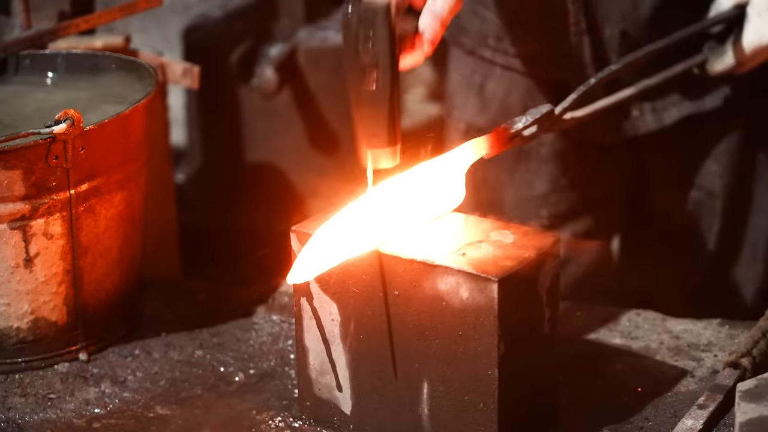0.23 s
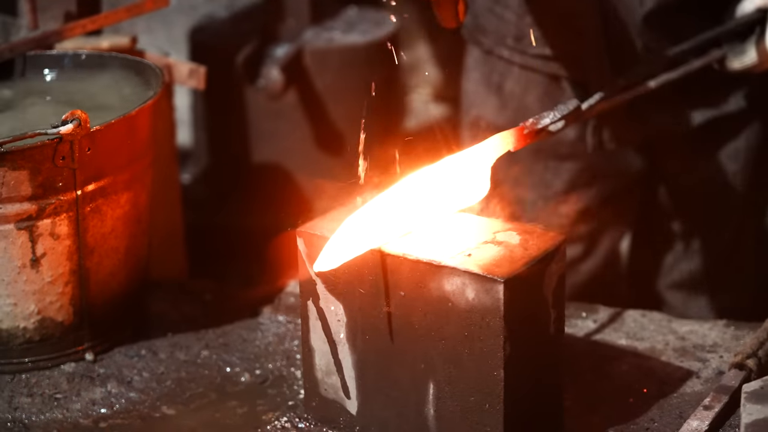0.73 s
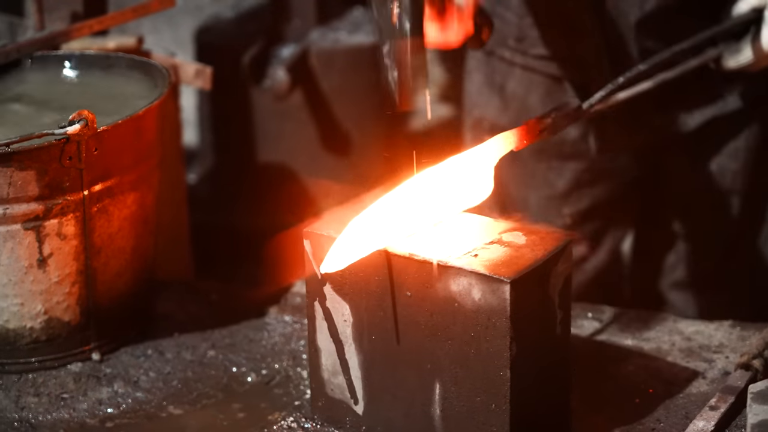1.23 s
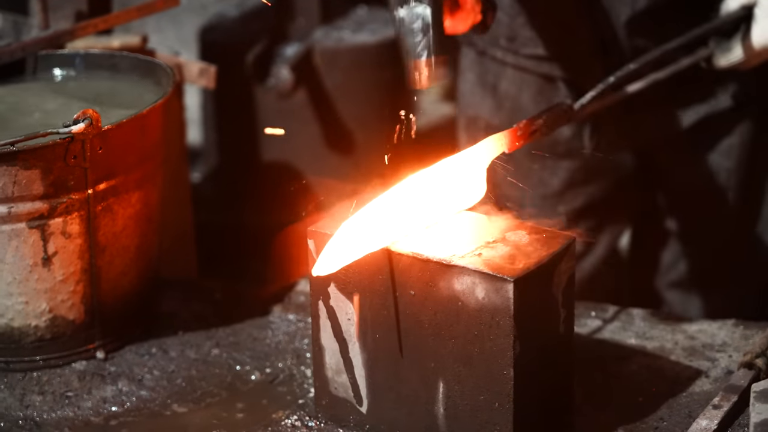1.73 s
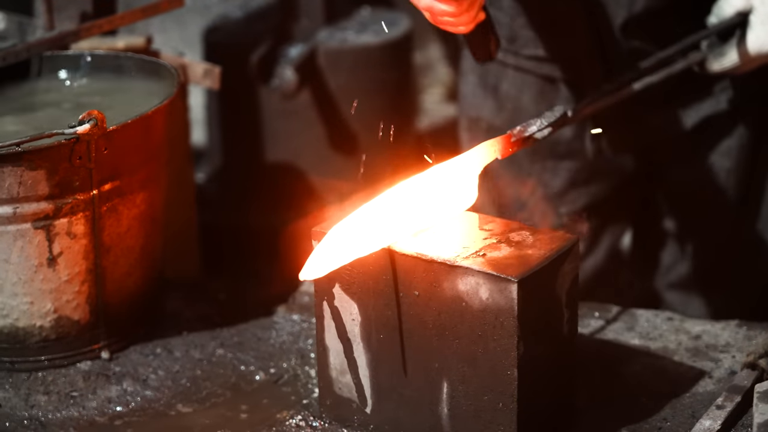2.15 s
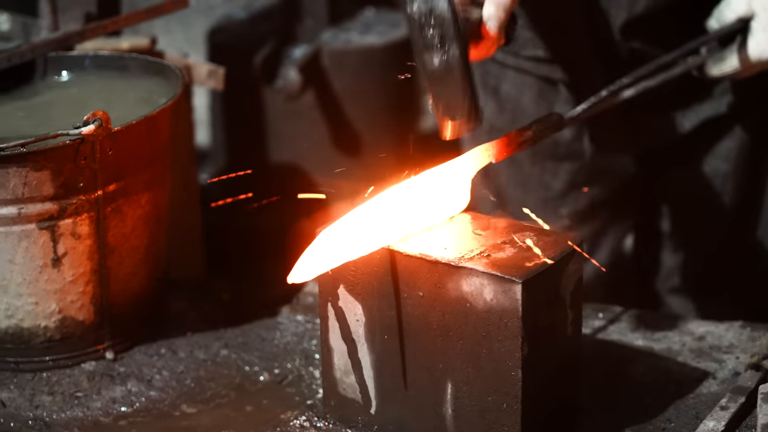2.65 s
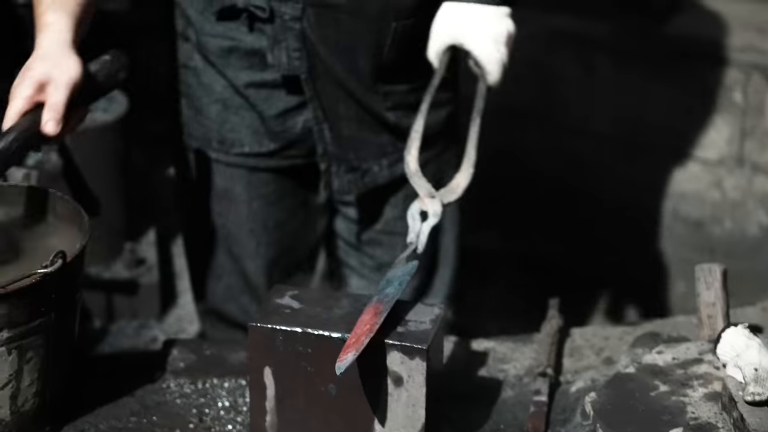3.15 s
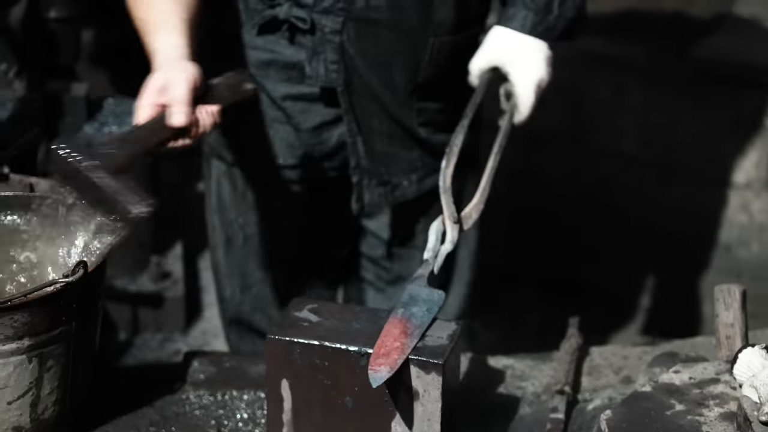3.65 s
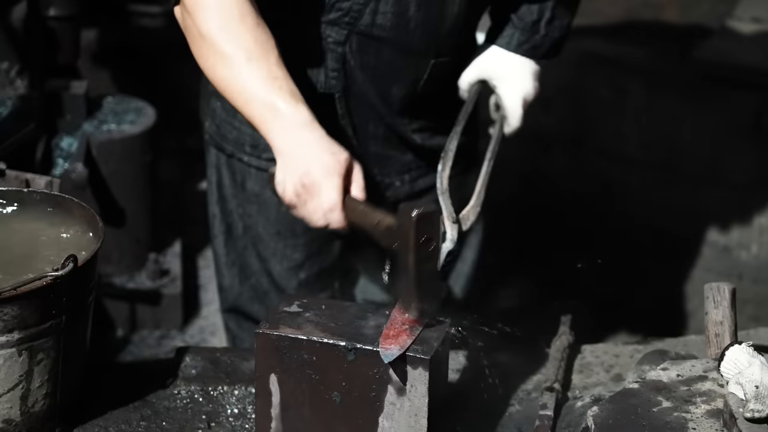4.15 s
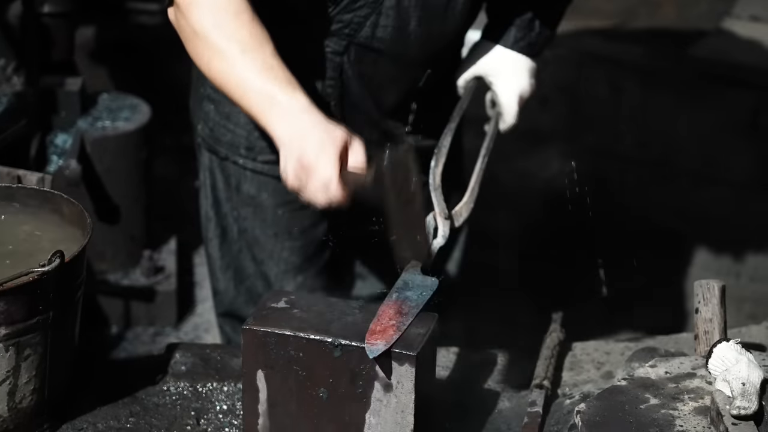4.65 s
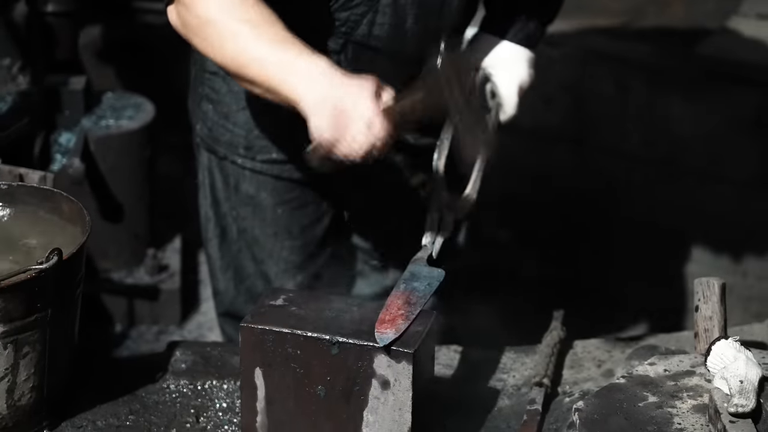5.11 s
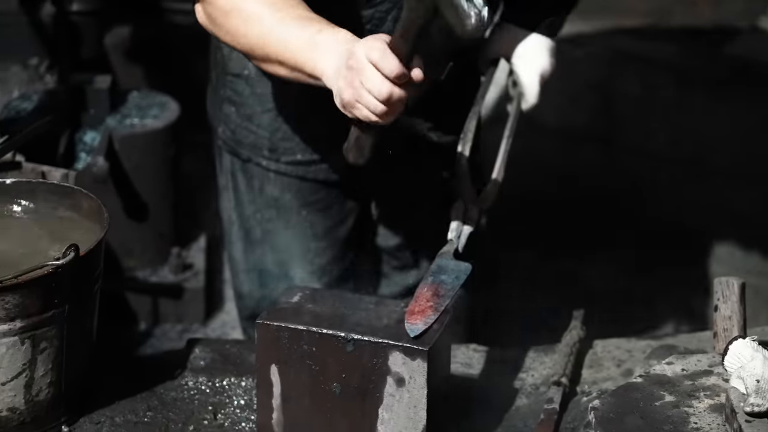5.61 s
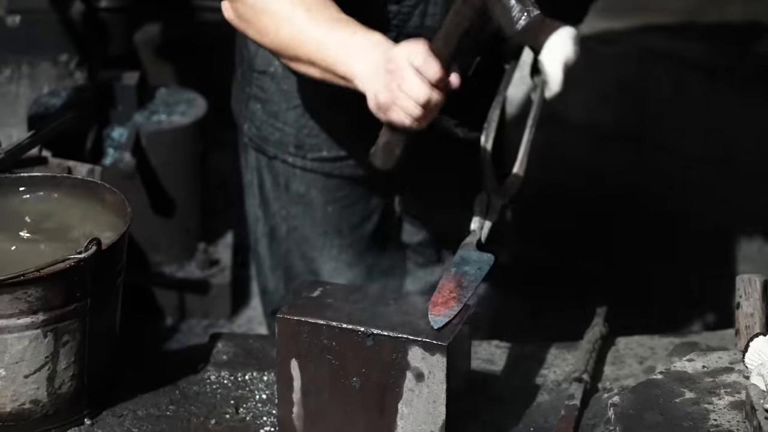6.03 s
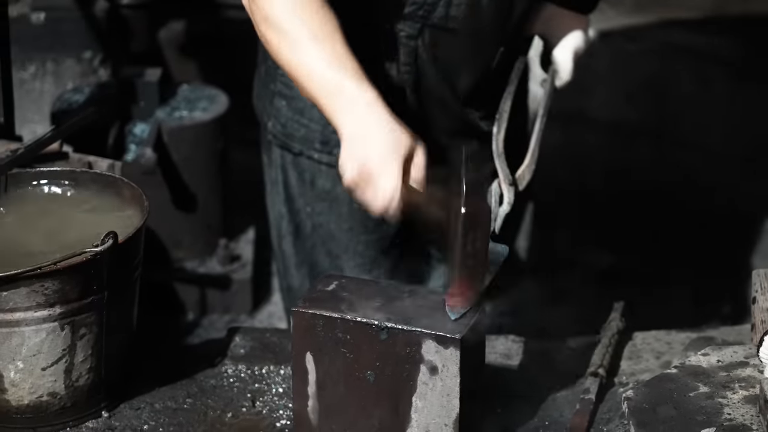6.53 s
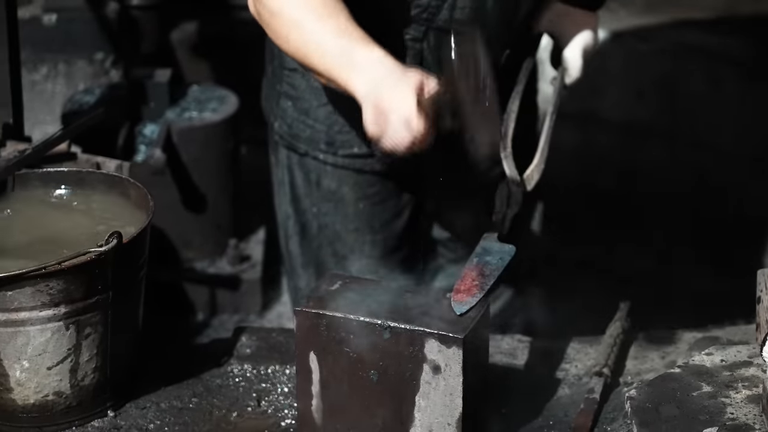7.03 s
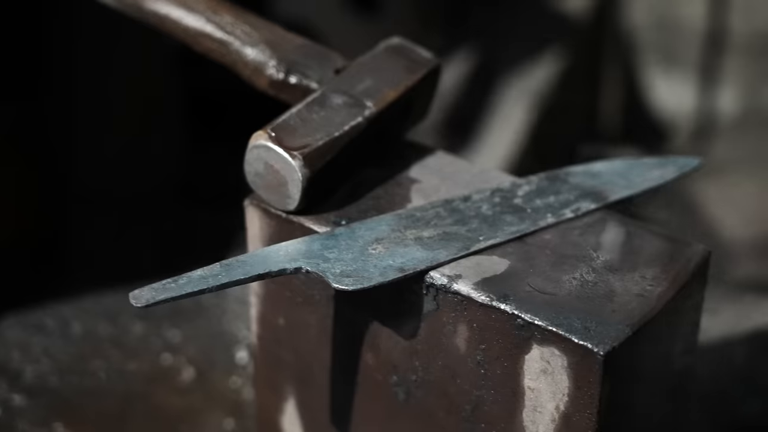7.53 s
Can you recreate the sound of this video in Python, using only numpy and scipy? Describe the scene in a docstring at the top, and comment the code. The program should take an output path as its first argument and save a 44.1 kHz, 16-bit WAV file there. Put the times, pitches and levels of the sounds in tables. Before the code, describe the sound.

Inside a hard-walled forge workshop, heard close, a hand hammer works glowing steel over a low, patchy roar that slowly fades. Two clanking blows come almost together at 0.0 and 0.1 s, then duller, knocking thuds at 0.5 and 0.9 s and about every third of a second until 2.9 s, with faint scale pops and fizz. At 3.1 s the place changes to a quieter, more distant forge hum. From 3.5 to 3.7 s bubbles drip and water splashes; spitting and sizzling swell from 3.85 s into a bright, wet blow at 4.1 s. From 4.55 to 7.27 s eight far louder, hard blows fall roughly every 0.4 s, each a sharp crack with clanking tongs, short high anvil ring and dense shop echo. At 7.55 s the echo is cut off; only very soft low noise and thin treble hiss remain.

```python
"""A hand hammer forges a blade on a block anvil: noise cracks plus dying sines of blade, tongs, anvil and
stand. First dull blows on glowing steel over the roar of the forge, which is patchy filtered noise. Then the
scene changes: the hammer is dipped in a bucket: bubbles drip, noise bursts spit, and hard blows ring the anvil
and fill the shop with decaying echoes. In a third scene only a quiet hiss over soft background noise remains."""
import sys
import numpy as np
from scipy import signal
from scipy.io import wavfile
from scipy.ndimage import uniform_filter1d

SR = 44100
rng = np.random.default_rng(int(sys.argv[2]) if len(sys.argv) > 2 else 0)


def put_to_file(sound):
    """Save the sound as 16-bit audio at rate SR, in the file named by the first command-line argument."""
    columns = np.atleast_2d(sound).T  # one column per channel
    safe = np.clip(columns, -1, 1)
    whole_steps = np.round(safe * 32767)
    wavfile.write(sys.argv[1], SR, whole_steps.astype(np.int16))


N = 342657
SCENE_CHANGES_S = 3.13, 7.545  # the scene changes
HARD_FROM_S = 4.3  # from here the steel is hard and the swings are full


def amp(db):
    """Decibels to amplitude factor."""
    return 10 ** (np.asarray(db) / 20)


def evened(x):
    """Scale to RMS 1."""
    return x / np.sqrt(np.mean(x ** 2) + 1e-20)


def read(points_hz, values, hz):
    """Interpolate a table along log frequency."""
    return np.interp(np.log(hz + 1), np.log(np.asarray(points_hz) + 1), values)


def add(mix, start_s, sound):
    """Add a sound in place, cut at the end of the mix."""
    part = mix[round(start_s * SR):][:len(sound)]
    part += sound[:len(part)]


def coloured(x, points, tilt_db_per_octave=0):
    """Causal (minimum-phase) filter with the given spectrum, tilted about 2 kHz."""
    hz = np.abs(np.fft.fftfreq(2048, 1 / SR))
    tilt_db = tilt_db_per_octave * np.log2((hz + 50) / 2000)
    gain_db = np.maximum(read(*np.transpose(points), hz) + tilt_db, -80)
    # the Hilbert transform of the log gain is the minimum phase
    spectrum = np.exp(np.conj(signal.hilbert(np.log(amp(gain_db)))))
    impulse = np.fft.ifft(spectrum).real[:1024]
    return signal.oaconvolve(x, impulse)


def noise(points, patchy_db, size):
    """Steady noise of RMS 1 with drifting louder and softer patches in time and frequency."""
    frames = 4 * N // size + 5
    hz = np.fft.rfftfreq(size, 1 / SR)
    real, imag, patches = rng.standard_normal((frames, len(hz), 3)).T
    patches = uniform_filter1d(patches, size=12, axis=0)
    patches = evened(uniform_filter1d(patches, size=8, axis=1))
    level_db = read(*np.transpose(points), hz)[:, None] + patchy_db * patches
    bins = (real + 1j * imag) * amp(level_db)
    return evened(signal.istft(bins, nperseg=size, noverlap=size - size // 4)[1][:N])


def rings(hz, db, t60_s, spread_db, t):
    """Dying sines of peak 1; each level varies at random by spread_db."""
    db = db + spread_db * rng.standard_normal(len(hz))
    out = np.zeros(len(t))
    for mode_hz, mode_db, mode_t60_s in zip(hz, db, t60_s):
        out += amp(mode_db - 60 * t / max(mode_t60_s, .01)) * np.sin(2 * np.pi * mode_hz * t)
    return out / abs(out).max()


# Shop echo in the first and second scene. Each row: frequency in Hz, relative colour in dB, t60 in s.
NEAR_ECHO = [(80.5, -26.5, 0.17), (223, 6, 0.64), (545, -1.5, 0.47), (900, 7.5, 0.42), (1360, 1, 0.4),
             (1950, 7, 0.43), (2750, 8, 0.41), (3880, 5.5, 0.34), (7000, 0, 0.48), (10000, -6, 0.44),
             (15100, -9.5, 0.4)]
FAR_ECHO = [(79, -30, 0.68), (218, 15.5, 0.37), (520, 2, 0.5), (767, -1.5, 0.48), (953, 8, 0.56),
            (1140, 2.5, 0.43), (1360, -1.5, 0.48), (2580, 3.5, 0.44), (4200, 1.5, 0.42), (7100, 1, 0.38),
            (10600, 1, 0.3), (16000, -11, 0.3)]


def echo(x, table, build_s, first_s):
    """Shop: sparse reflections build up after first_s, then each band dies at its own speed."""
    points_hz, colour_db, t60_s = np.transpose(table)
    sparse = rng.standard_normal(SR) * (rng.random(SR) < .15)
    hz, t, bins = signal.stft(sparse, SR, nperseg=256)
    decay_db = 60 * t / read(points_hz, t60_s, hz)[:, None]
    bins = bins * amp(read(points_hz, colour_db, hz)[:, None] - decay_db)
    tail = signal.istft(bins, SR, nperseg=256)[1][:SR]
    since_first_s = np.maximum(np.arange(SR) / SR - first_s, 0)
    tail = tail * (1 - np.exp(-since_first_s / build_s))
    return signal.fftconvolve(x, tail / np.linalg.norm(tail))[:N]


# Third-scene background spectrum. Each row: frequency in Hz, relative density in dB per Hz.
THIRD_SPECTRUM = [(18, -67), (30, -43), (119, -4), (359, -19), (384, -18), (439, -18.5), (816, -23),
                  (1220, -22.5), (6000, -36), (7800, -81), (13200, -120)]
THIRD_RMS_DB = -54


def third_scene_background():
    """Soft patchy noise, strongest in the low frequencies."""
    return amp(THIRD_RMS_DB) * noise(THIRD_SPECTRUM, 1.9, size=2048)


HISS_RMS_DB = -60


def hiss():
    """Treble hiss; a close surface returns it 38 samples later and combs it."""
    x = noise([(4000, -20), (7000, -3), (9500, -3), (13000, -5), (15600, -11), (16000, -40)], 0.97, size=256)
    return amp(HISS_RMS_DB) * evened(x + .6 * np.roll(x, 38))


# Forge from afar. Each row: frequency in Hz, relative density in dB per Hz.
DISTANT_FORGE_SPECTRUM = [(18, -57), (30, -33), (107, -4.5), (158, -4), (185, -6), (312, -17), (384, -14),
                          (497, -15), (1170, -18), (1920, -21), (7240, -33.5), (15000, -51.5)]
DISTANT_FORGE_RMS_DB = -59.5


def distant_forge():
    """Nearly even low noise: the forge heard from afar."""
    return amp(DISTANT_FORGE_RMS_DB) * noise(DISTANT_FORGE_SPECTRUM, 0.38, size=2048)


# Forge close by. Each row: frequency in Hz, relative density in dB per Hz.
ROAR_SPECTRUM = [(18, -68), (30, -62), (135, 2.5), (217, -7), (311, -8.5), (467, -18), (539, -14.5),
                 (700, -24), (808, -22), (1690, -27), (2860, -35), (9000, -47), (11700, -82), (19800, -120)]
ROAR_START_DB, ROAR_FADE_DB_PER_S = -42, -2.5


def forge_roar(t):
    """Patchy low noise that fades steadily."""
    return amp(ROAR_START_DB + ROAR_FADE_DB_PER_S * t) * noise(ROAR_SPECTRUM, 1.5, size=2048)


# Hot scale and water fizzing. Each row: time in s, level in dB.
FIZZ_LEVEL = [(0.0, -66), (1.2, -81), (2.1, -65.5), (3.07, -68), (3.3, -78), (3.76, -68), (3.85, -66),
              (3.88, -58), (4.06, -51), (4.1, -65), (4.22, -65), (4.32, -86), (7.5, -80)]
# Fizz spectrum. Each row: frequency in Hz, relative density in dB per Hz.
FIZZ_SPECTRUM = [(2000, -27), (5000, -8), (8000, 6.5), (12000, 3), (15500, -2), (16200, -33)]


def fizz(t):
    """Treble noise following the level curve of fizzing scale and water."""
    return amp(np.interp(t, *np.transpose(FIZZ_LEVEL))) * noise(FIZZ_SPECTRUM, 1.5, size=256)


# Scale popping, water splashing and spitting, and a small rattle at 4.885 s.
# Each row: start in s, peak in dB, centre in Hz, t60 in s.
BURSTS = [(.373, -44, 8800, 0.032), (.511, -45, 11000, .03), (.55, -48, 12000, .037),
          (1.164, -52, 7500, .08), (1.896, -48, 7860, .1), (2.425, -49, 10000, .012),
          (2.47, -44, 7960, .015), (3.163, -49, 6000, 0.019), (3.287, -48, 7750, 0.032),
          (3.496, -54, 6000, 0.016), (3.549, -54, 6150, .012), (3.613, -47, 5970, .05),
          (3.653, -47, 3000, .022), (3.668, -31, 3600, 0.029), (3.702, -42, 4420, .073),
          (3.8652, -31, 5100, 0.019), (3.918, -35, 10000, .041), (3.931, -36, 10500, 0.022),
          (3.991, -33, 9730, 0.077), (4.007, -31, 10500, .05), (4.042, -28, 9900, 0.058),
          (4.066, -29, 9450, 0.09), (4.885, -48, 3570, 0.15)]
RISE_SHARE = .07  # rise time constant as a share of t60
# faint pops: mid level, centre range, mid t60
FAINT_DB, FAINT_RANGE_HZ, FAINT_T60_S = -53, (5000, 13000), .03


def bursts():
    """Grainy noise bursts round a centre pitch: loud ones in place, 16 faint ones at random until HARD_FROM_S."""
    out, t = np.zeros(N), np.arange(SR // 5) / SR
    when, size, pitch = rng.random((16, 3)).T
    faint_db = FAINT_DB + 6 * (size - .5)
    faint_hz = np.interp(pitch, (0, 1), FAINT_RANGE_HZ)
    faint = zip(when * HARD_FROM_S, faint_db, faint_hz, FAINT_T60_S * (.5 + size))
    for start_s, db, hz, t60_s in [*BURSTS, *faint]:
        grain_db = 3.5 * rng.standard_normal(len(t) // 20 + 1)  # one level per 20 samples
        grains = rng.standard_normal(len(t)) * amp(grain_db).repeat(20)[:len(t)]
        colour = [(hz / 2.6, -26), (hz / 1.35, -5), (hz, 0), (hz * 1.5, -4), (hz * 2.6, -20)]
        burst = coloured(grains, colour)[:len(t)]
        rise = 1 - np.exp(-t / max(RISE_SHARE * t60_s, .0002))
        burst = burst * amp(-60 * t / max(t60_s, .005)) * rise
        add(out, start_s, amp(db) * burst / abs(burst).max())
    return out + amp(-9) * echo(out, NEAR_ECHO, .01, .003)


# Drips. Each row: start in s, level before the rise in dB, starting bubble pitch in Hz.
DRIPS = [(3.476, -51, 820), (3.487, -49, 1090), (3.534, -47, 900), (3.543, -46, 560), (3.541, -48, 1120),
         (3.553, -46.5, 2070), (3.59, -49, 656), (3.651, -47, 1185), (3.685, -53, 1190)]
DRIP_T60_S, DRIP_RISE_S = 0.048, 0.00077


def water():
    """Bubbles: short dying sines that rise in pitch, with their echo."""
    out, t = np.zeros(N), np.arange(SR // 10) / SR
    for start_s, db, hz in DRIPS:
        bubble = np.sin(2 * np.pi * hz * (t + 5.7 * t ** 2))
        envelope = amp(db - 60 * t / DRIP_T60_S) * (1 - np.exp(-t / DRIP_RISE_S))
        add(out, start_s, bubble * envelope)
    return out + amp(-6) * echo(out, FAR_ECHO, 0.035, 0.0068)


# Pitches of the block under the anvil, in Hz.
STAND_HZ = 85, 134, 200, 270, 407, 454, 555, 770, 834
# Same pitches. Each row: relative level in dB, t60 in s.
STAND = [(-46, .1), (0.5, 0.11), (-5, 0.11), (-4.5, 0.061), (-13.5, 0.1), (-7.5, 0.09), (-12.5, 0.03),
         (-12, 0.063), (-13.5, 0.091)]


def stand_thud(t):
    """The block under the anvil: low dying sines with a rise time constant of 6 ms."""
    return rings(STAND_HZ, *np.transpose(STAND), 4.05, t) * (1 - np.exp(-t / 0.006))


def floor_push(t):
    """The floor gives under a full swing: one fast-dying 34 Hz sine."""
    return np.sin(2 * np.pi * 34 * t) * np.exp(-t / 0.0089)


# Pitches of tongs and blade, in Hz.
TONGS_HZ = 893, 938, 1010, 2180, 2300, 2420, 2940, 3915, 4070, 4220
# Same pitches. Each row: relative level in dB, t60 in s, dB gained across the face.
TONGS = [(-4, 0.061, 4), (0, 0.076, -7), (-4.5, 0.099, -3), (-4.5, 0.039, 1), (-1, 0.027, 11.5),
         (1.5, 0.02, 7.5), (-4, 0.017, 6), (-7, 0.082, 0), (1.5, 0.02, -3), (0.5, 0.02, -10)]


def tongs_clank(across, t):
    """Tongs and blade: dying sines balanced by the landing place across the face."""
    mode_db, t60_s, across_db = np.transpose(TONGS)
    return rings(TONGS_HZ, mode_db + across * across_db, t60_s, 2.0, t)


KNOCK_HZ, KNOCK_T60_S = 1450, .01


def blade_knock(t):
    """The blade's short bending ring: one dying sine."""
    return amp(-60 * t / KNOCK_T60_S) * np.sin(2 * np.pi * KNOCK_HZ * t)


# Pitches of anvil and hammer head, in Hz.
ANVIL_HZ = 6352, 7760, 7858, 8355, 8420, 8915, 9445, 11400, 12400
# Same pitches. Each row: relative level in dB, t60 in s, dB gained along the face, dB gained across it.
ANVIL = [(-0.5, 0.053, 0.5, -15), (-4.5, 0.08, -7.5, -11), (-1, 0.11, -6.5, 7), (-4.5, 0.15, 1, -7.5),
         (-6.5, .08, 3, -11.5), (-6.5, 0.14, 8.5, -7.5), (-13, 0.09, 1, 12), (-10, .11, -4.5, -6),
         (-28, .05, 10, -1.5)]


def anvil_ring(along, across, t):
    """Anvil and hammer head: high dying sines balanced by the landing place."""
    mode_db, t60_s, along_db, across_db = np.transpose(ANVIL)
    return rings(ANVIL_HZ, mode_db + along * along_db + across * across_db, t60_s, 1.0, t)


# Crack on glowing and on darker, cooler steel. Each row: frequency in Hz, relative density in dB per Hz.
GLOWING_CRACK = [(60, -32.5), (300, -6.5), (930, -1.5), (1510, -8.5), (2600, -11.5), (4370, -13.5),
                 (7000, -15.5), (9500, -18), (11000, -23.5), (13800, -32), (15700, -31), (17000, -46)]
DARK_CRACK = [(60, -42.5), (300, -12), (915, -8.5), (1400, 0.5), (2290, 0), (3200, -1.5), (4060, -1.5),
              (5200, -3.5), (8000, -4.5), (9800, -9), (11500, -8.5), (14500, -12.5), (15700, -13),
              (17000, -45)]
TILT_DB_PER_OCTAVE = -0.25, 0.2  # before, after HARD_FROM_S


def contact_crack(top_db, hard, dark, t):
    """Noise as long as the contact, and a smooth click of equal energy; dark steel cracks brighter."""
    contact = np.exp(-(t / (.0022 if hard else .0028)) ** 2) + 0.62 * np.exp(-t / 0.01)
    burst = rng.standard_normal(len(t)) * contact
    impulse = (t == 0).astype(float)
    colour = [(hz, level + top_db * (hz > 10000)) for hz, level in (DARK_CRACK if dark else GLOWING_CRACK)]
    crack = coloured(burst, colour, TILT_DB_PER_OCTAVE[hard])[:len(t)]
    click = coloured(impulse, colour, TILT_DB_PER_OCTAVE[hard])[:len(t)]
    crack = crack / abs(crack).max()
    return crack, click * np.linalg.norm(crack) / np.linalg.norm(click)


# thud levels against the crack
HARD_THUD_DB, SQUARE_THUD_DB = -18, 0.55  # hard steel; square blow on soft steel
SQUARE_KNOCK_DB = -6.5  # knock from which a blow lands square on the blade
THUD_LOSS_DB_PER_DB = 0.76  # on soft steel, per dB of knock under SQUARE_KNOCK_DB


def blow(db, top_db, knock_db, clank_db, ring_db, along, across, hard, dark):
    """One blow: near sound (crack plus body) and what the shop receives (click plus body)."""
    t = np.arange(SR // 4) / SR
    crack, click = contact_crack(top_db, hard, dark, t)
    off_square_db = min(knock_db - SQUARE_KNOCK_DB, 0)
    thud_db = HARD_THUD_DB if hard else SQUARE_THUD_DB + THUD_LOSS_DB_PER_DB * off_square_db
    body = amp(knock_db) * blade_knock(t)
    body += amp(clank_db) * tongs_clank(across, t)
    body += amp(ring_db) * anvil_ring(along, across, t)
    body += amp(thud_db) * stand_thud(t)
    # keeps deep bass out of knock, clank, ring and thud
    body = signal.sosfilt(signal.butter(4, 70, "high", fs=SR, output="sos"), body)
    body = body + hard * amp(thud_db - 26.0) * floor_push(t)
    return amp(db) * (crack + body), amp(db) * (click + body)


# Blows. Each row: start in s, crack peak in dB, gain above 10 kHz in dB, then against the crack knock in dB,
# clank in dB and ring in dB, then landing place along and across the face (-1 to 1).
BLOWS = [(0.0143, -11.5, -13, -19, 1, -5, 1, 1), (0.1087, -13.5, -11, -29, -1, -12.5, 0.63, 1),
         (0.4756, -18, -4, -3.5, -28, -32, 0, 0), (0.8802, -12, -4, -6, -23, -27, 0.4, 0.3),
         (1.2539, -10, 2, -7.5, -10, -22, -.5, 0), (1.6017, -10, 4, -3.5, -6.5, -25, -.5, 0.53),
         (1.9298, -9.5, 5.5, -4, -12, -30, 0, 0), (2.259, -11.5, -1, 6, -3, -38, 0, 0.5),
         (2.5664, -12, 6.5, -4.5, -10, -31, 0, 0), (2.8791, -13.5, -1, -8, -7, -39, .8, -0.12),
         (4.0809, -11, 3.5, -19, -13, -21, -0.3, -1), (4.5624, -4, 1.5, -31, -4.5, -10.5, 0.97, 0.42),
         (4.9719, -2.5, -3.5, -22, -5.5, -12.5, 0.99, 0.3), (5.3767, 0.5, -3.5, -25, -8, -9, 0.47, 0.4),
         (5.7654, -1.5, -4.5, -18, -7.5, -20.5, -0.21, -0.079),
         (6.1498, -1.5, -4.5, -13.5, -7, -8.5, -0.78, -0.11),
         (6.531, -2, -2.5, -13, -6.5, -7.5, -0.5, 0.022), (6.9015, -0.5, -5, -21, -8, -6.5, 0.68, -0.019),
         (7.2659, -0.5, -3, -28, -7.5, -9, 0.73, -0.051)]
ECHO_DB = -12.5, -2  # send to the shop before, after HARD_FROM_S


def hammer(place):
    """Blows of one scene; the echo drifts with time between two tails."""
    near, tail_a, tail_b = np.zeros((3, N))
    for start_s, *row in BLOWS:
        if np.searchsorted(SCENE_CHANGES_S, start_s) == place:
            hard = int(start_s > HARD_FROM_S)
            sound, sent = blow(*row, hard, dark=place > 0)
            sent = sent * amp(ECHO_DB[hard])
            add(near, start_s, sound)
            add(tail_a, start_s, sent * np.cos(1.3 * start_s))
            add(tail_b, start_s, sent * np.sin(1.3 * start_s))
    room = (FAR_ECHO, 0.012, 0.007) if place else (NEAR_ECHO, 0.011, 0.0022)
    return near + echo(tail_a, *room) + echo(tail_b, *room)


def scene():
    """Three scenes in turn, each with its own background, joined by 5.4 ms crossfades."""
    t = np.arange(N) / SR
    at_second, at_third = [np.clip((t - move_s) / 0.0054 + .5, 0, 1) for move_s in SCENE_CHANGES_S]
    fizz_and_bursts = fizz(t) + bursts()
    first = forge_roar(t) + fizz_and_bursts + hammer(0)
    second = distant_forge() + fizz_and_bursts + water() + hammer(1)
    third = third_scene_background() + hiss()
    mix = first * (1 - at_second) + second * (at_second - at_third) + third * at_third
    return mix[None]


EDGE_HZ = 16900


def record(dry):
    """Microphone: deep bass drops, loud peaks round off, the top sags above 15.5 kHz, then the band limit."""
    x = signal.sosfilt(signal.butter(1, 25, "high", fs=SR, output="sos"), dry)
    x = .95 * np.tanh(x / .95)
    top = signal.firwin2(255, [0, 15500, 16000, SR / 2], [1, 1, .15, .15], fs=SR)
    edge = signal.firwin(511, EDGE_HZ, window=("kaiser", 11), fs=SR)
    return signal.oaconvolve(x, np.convolve(top, edge)[None], "same")


dry = scene()
out = record(dry)
put_to_file(out)
```